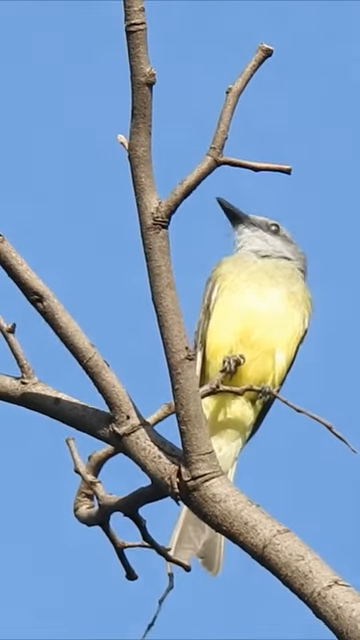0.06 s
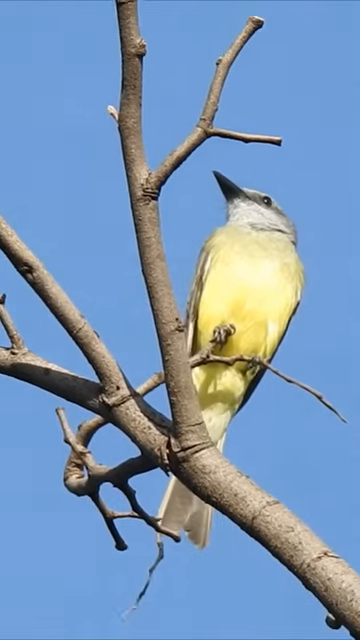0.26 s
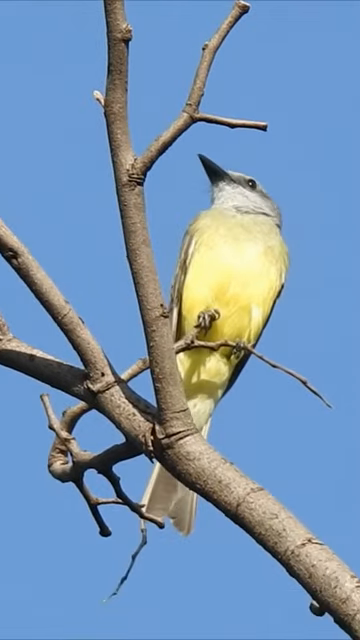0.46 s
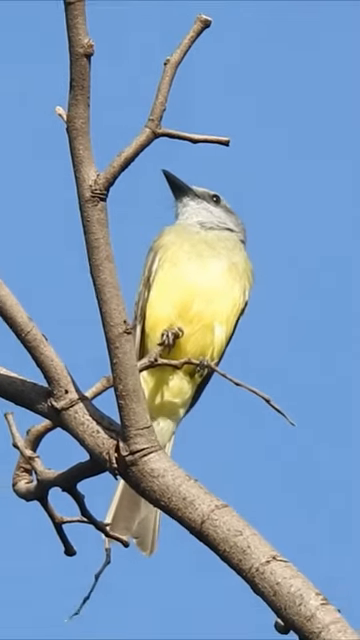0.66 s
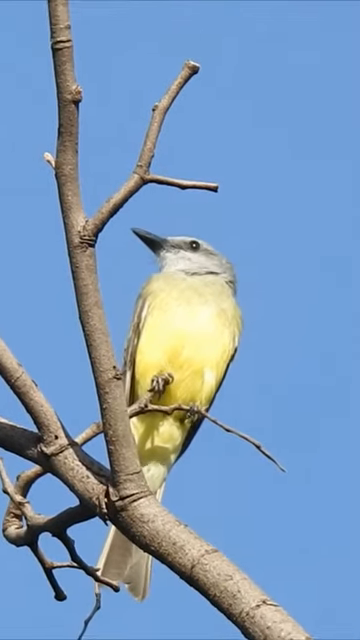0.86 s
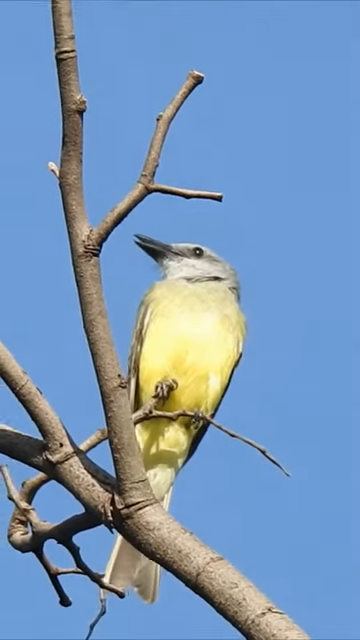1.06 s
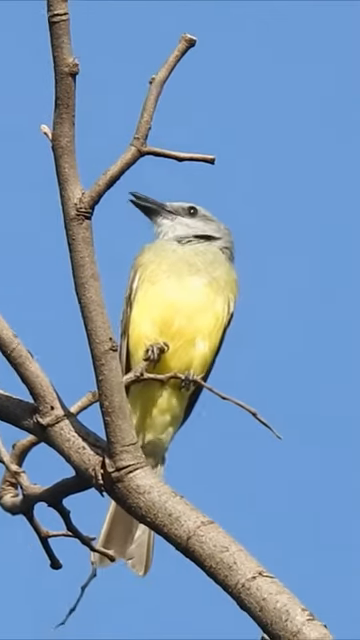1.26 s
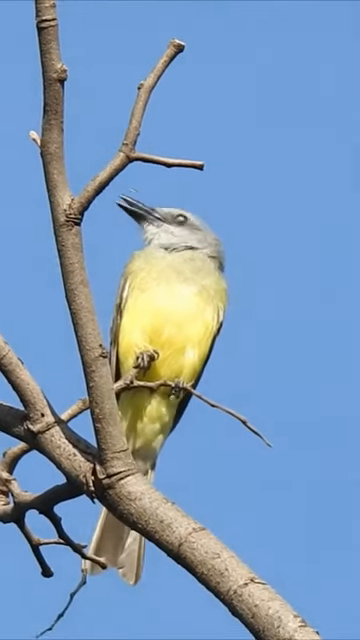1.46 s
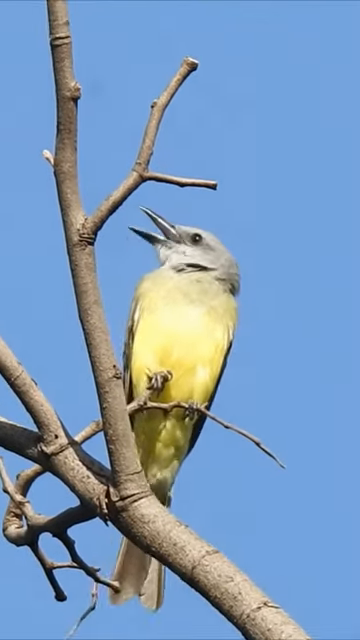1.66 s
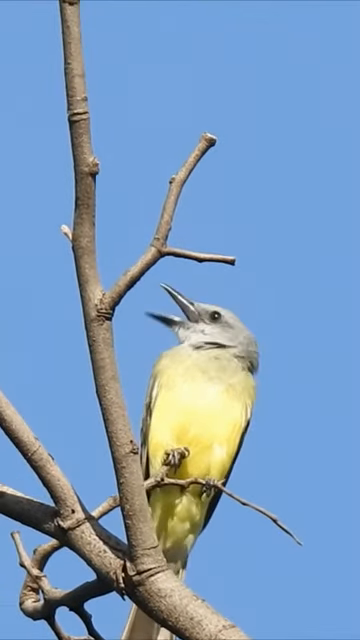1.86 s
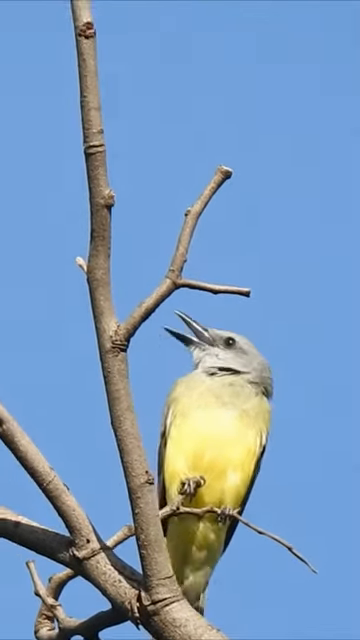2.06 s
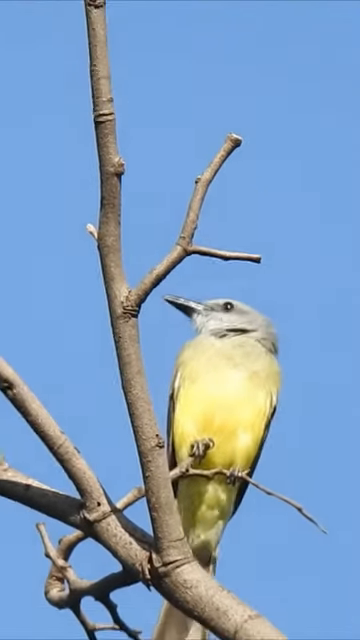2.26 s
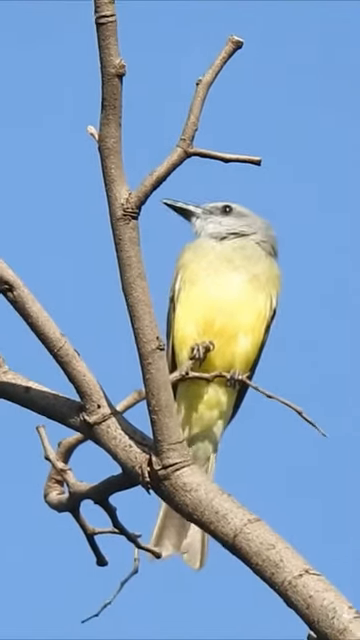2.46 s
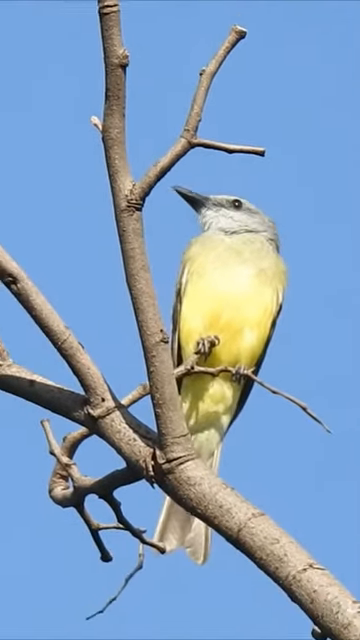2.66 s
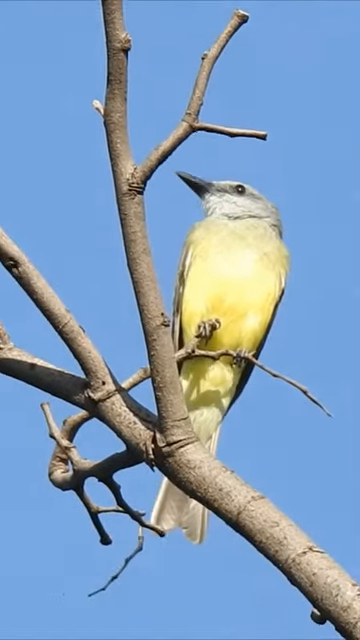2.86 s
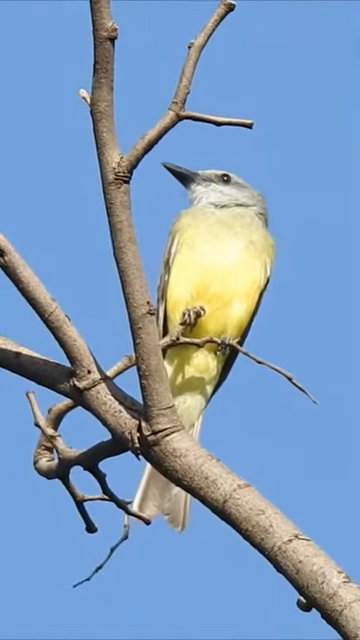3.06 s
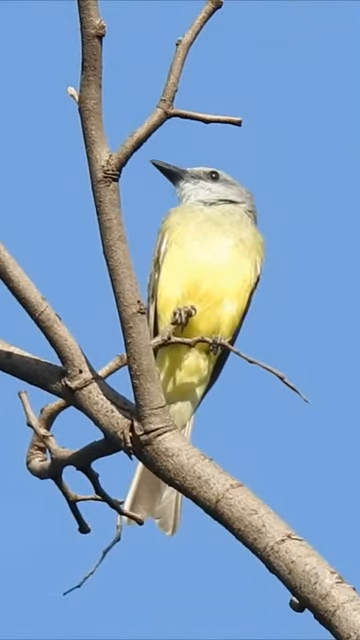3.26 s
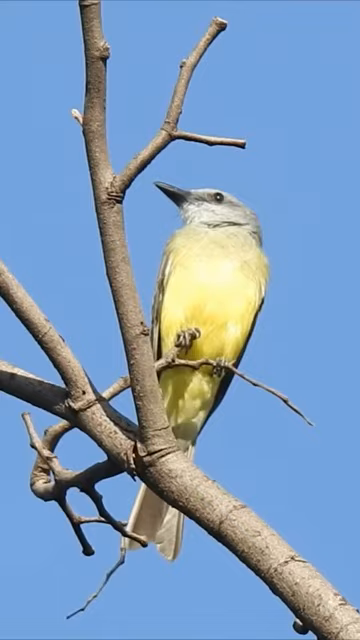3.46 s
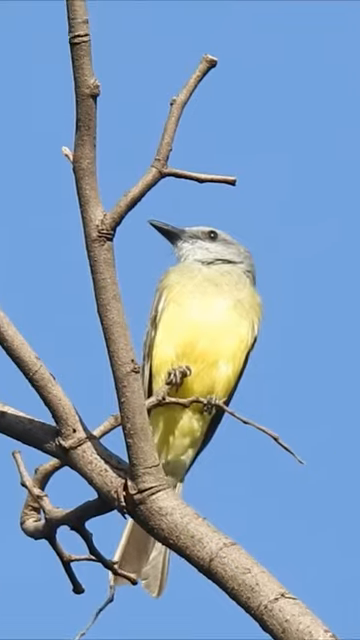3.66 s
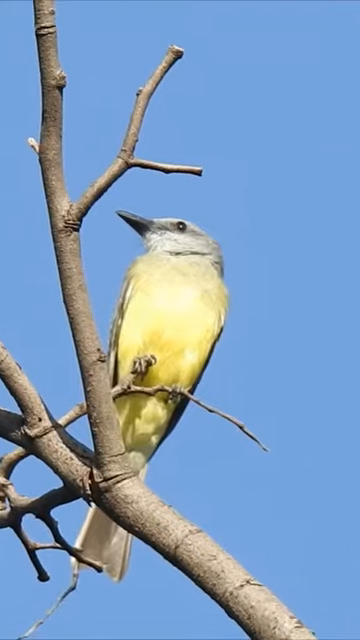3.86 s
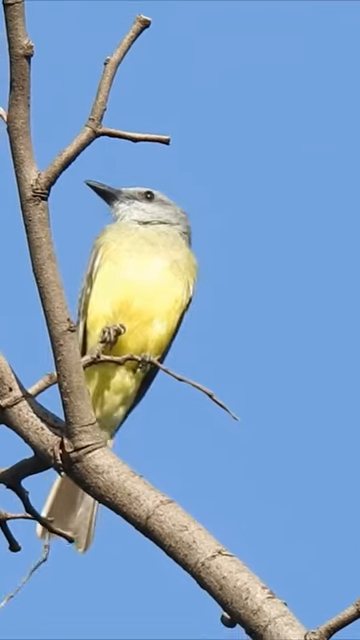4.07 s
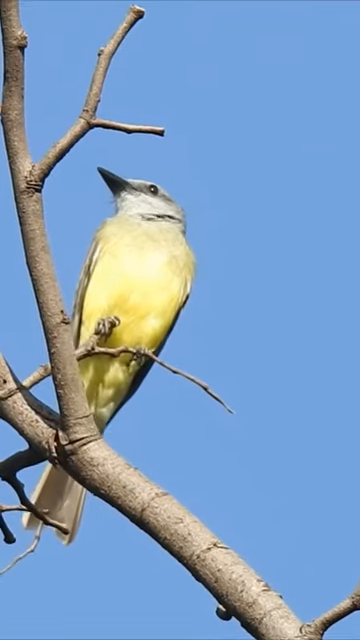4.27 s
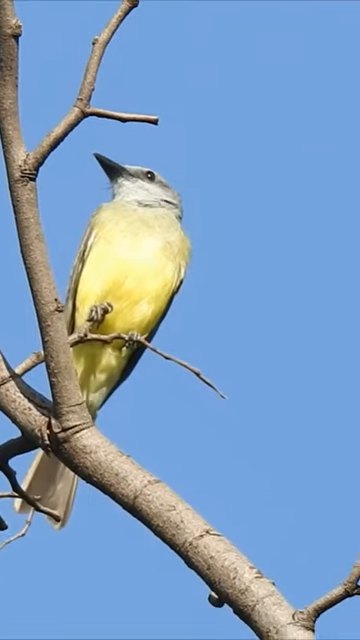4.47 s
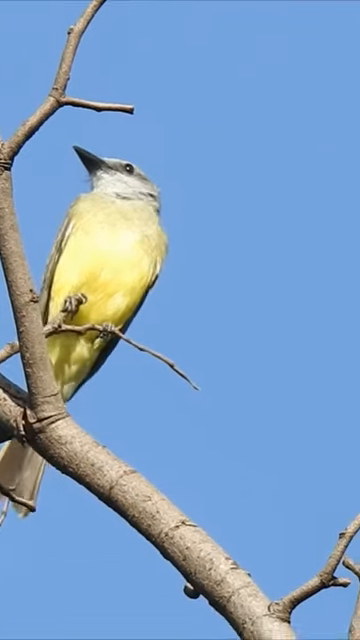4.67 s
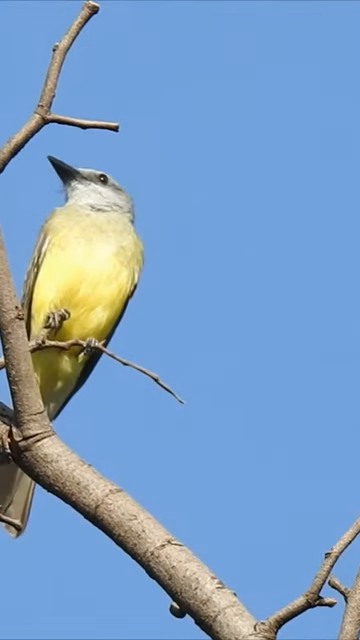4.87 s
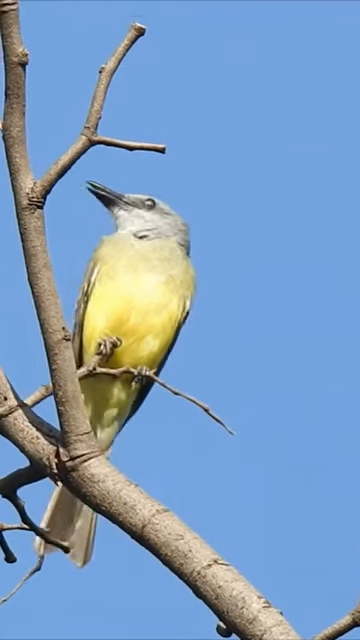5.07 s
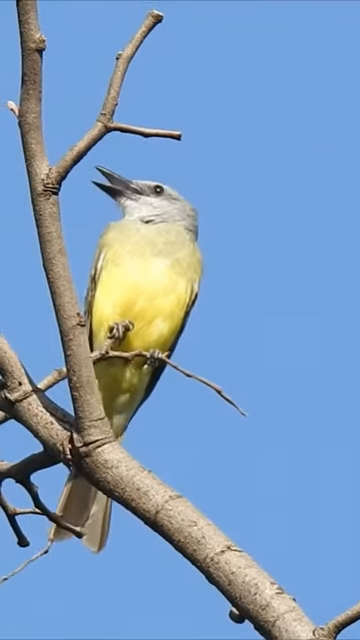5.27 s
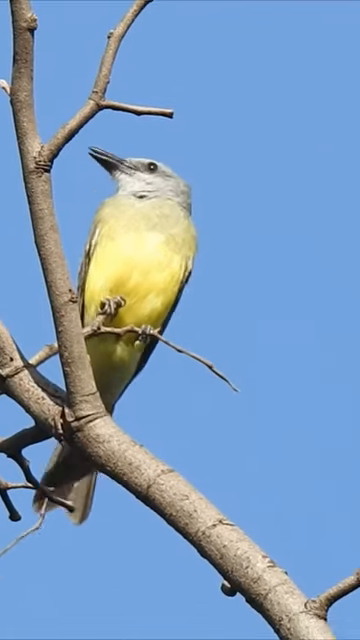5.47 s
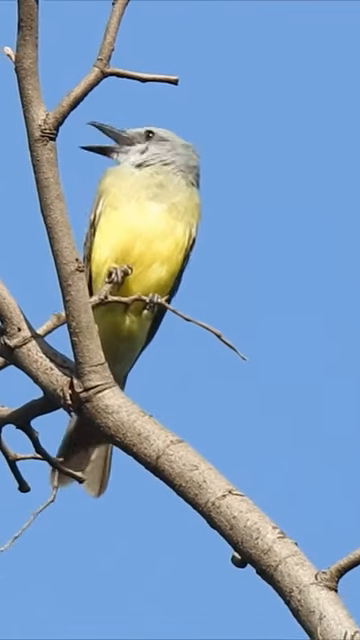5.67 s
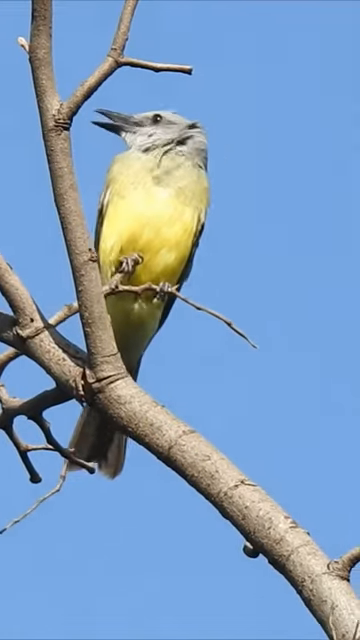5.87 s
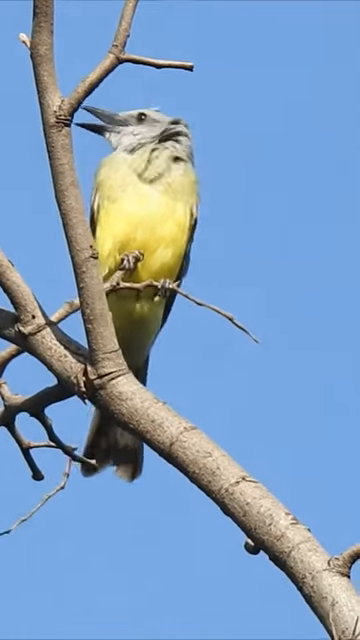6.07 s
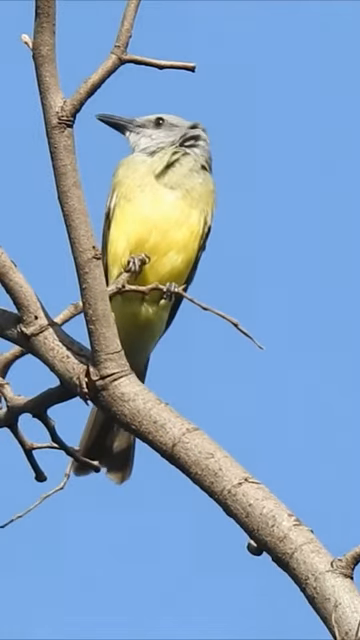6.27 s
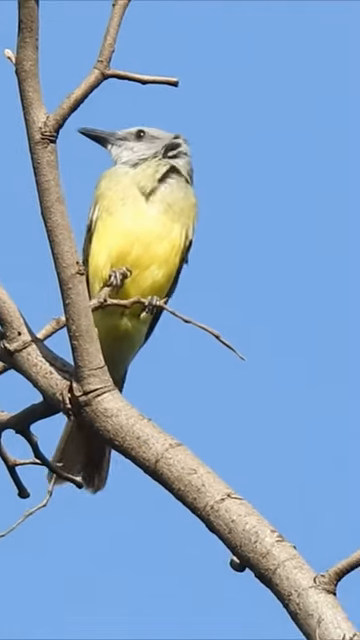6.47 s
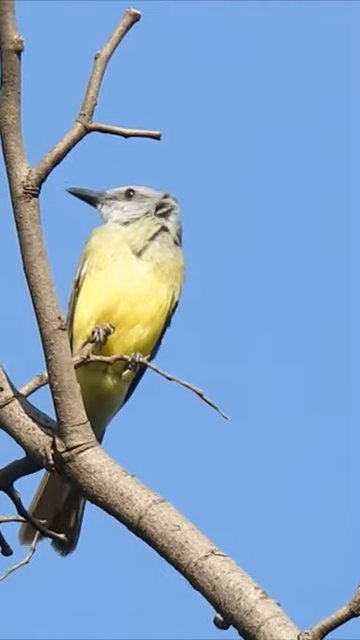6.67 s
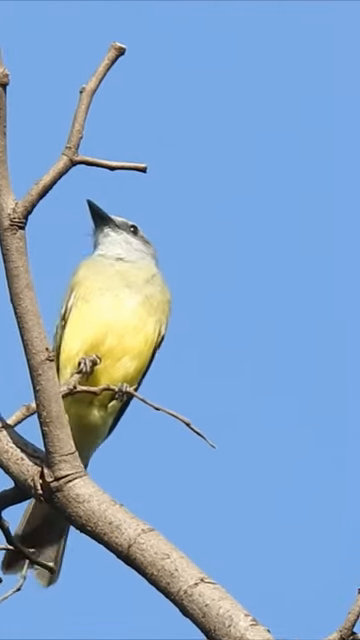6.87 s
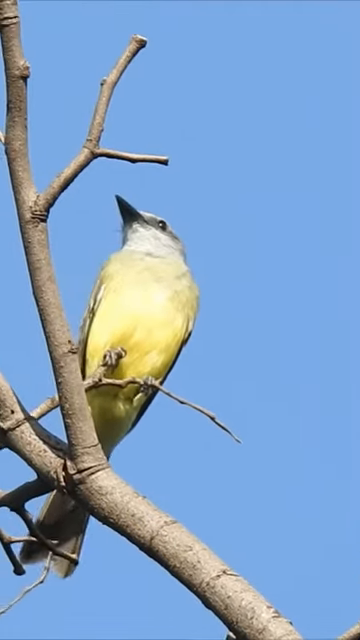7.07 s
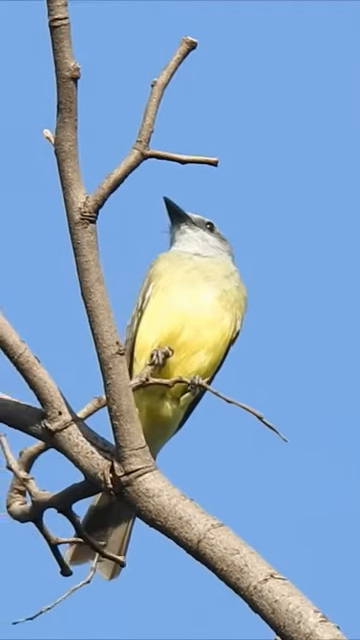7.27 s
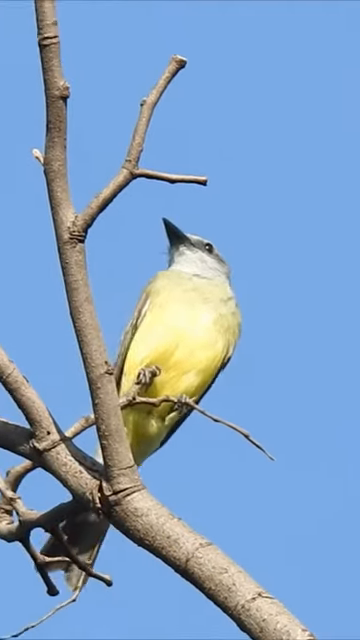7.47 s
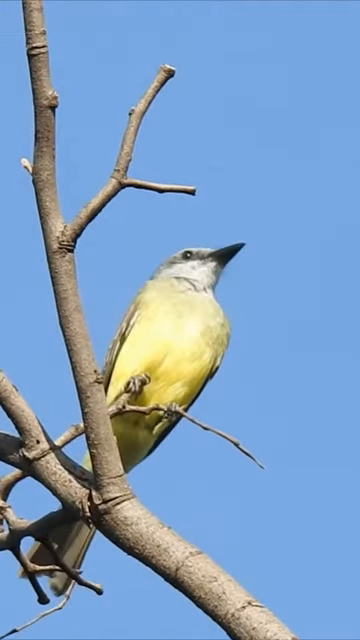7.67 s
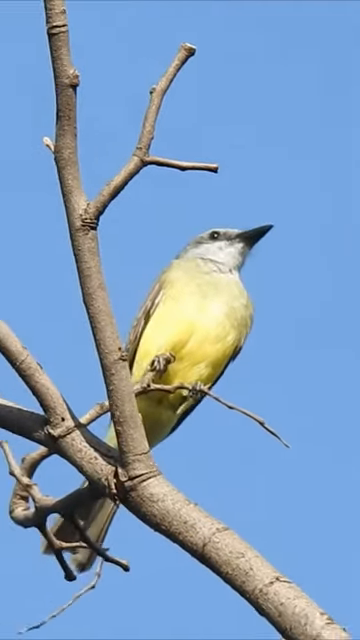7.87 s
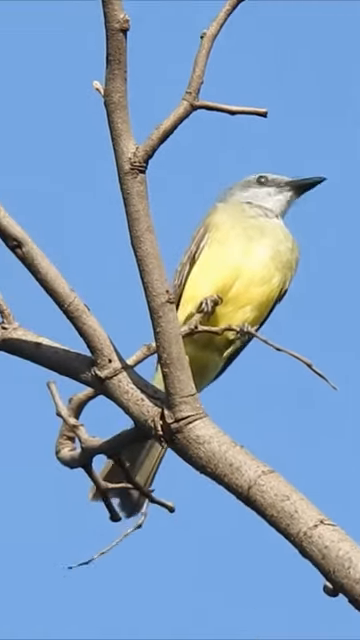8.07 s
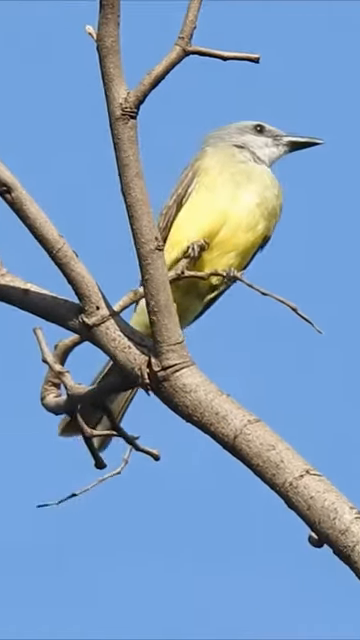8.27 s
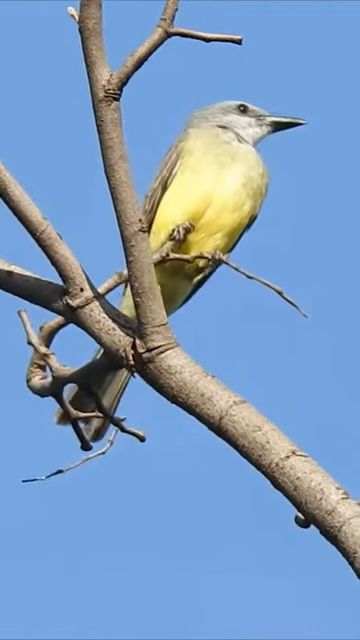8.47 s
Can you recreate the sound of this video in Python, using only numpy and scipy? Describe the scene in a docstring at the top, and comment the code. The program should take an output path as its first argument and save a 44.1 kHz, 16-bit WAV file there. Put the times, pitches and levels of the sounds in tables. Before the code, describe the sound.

A quiet outdoor place among trees: soft low traffic rumble, faint droning and a light rush of air, with a dim insect chorus. A faint distant bird call comes at 0.3 s and a tiny tsip at 0.9. At 1.2 s a bird close to the microphone sings loudly: a quavering high whistle, three round pips, a short buzzy note, an arching whistle, two sharp chips, then a hurried flourish ending at 2.2 s, with brief scattered echoes off the branches. From 3.1 to 3.8 s distant birds give faint buzzy slurs, then a rapid far twitter at 4.2. A thin wavering insect tone near the song's pitch grows from 3.8 to 4.7 s and stays. The close bird repeats its phrase from 5.2 to 6.3 s. Faint tsips follow at 6.8, then weak twitters from 7.4 to 8. The deepest rumble drops near 8 s as a soft, slightly higher roar rises until the end at 8.5.

```python
"""Outdoors among trees: a kingbird sings two twittering phrases, close by, over distant traffic.
Each phrase runs from a quavering lead note through pips, an arch and chips to a rising flourish.
The song is made of bent sine whistles with a faint octave; noise echoes scatter it among the trees.
Far birds are fainter whistles heard mostly by way of the trees; one insect holds a thin wavering tone.
Shaped noise makes the traffic, the rush of air, the insect chorus and a few faint ticks."""
import sys
import numpy as np
from scipy import signal
from scipy.fft import rfft, irfft, next_fast_len
from scipy.io import wavfile
from scipy.ndimage import uniform_filter1d, minimum_filter1d, map_coordinates

SR = 44100
rng = np.random.default_rng(int(sys.argv[2]) if len(sys.argv) > 2 else 0)


def wav_record(signal):
    """Record a signal, one row per channel, as 16-bit PCM in the file named by sys.argv[1]."""
    frames = np.transpose(np.atleast_2d(signal))
    bounded = np.clip(frames, -1, 1)
    # unit amplitude maps onto the largest positive 16-bit level
    quanta = np.round(bounded * 32767).astype(np.int16)
    wavfile.write(sys.argv[1], SR, quanta)


N = 376173

# Traffic rumble spectrum: (frequency [Hz], relative density [dB per Hz])
RUMBLE_SPECTRUM = [(18, -41.5), (30, -22.5), (38, -13), (54, -5.5), (71, 1.5), (90, -4), (120, -9),
                   (150, -11), (195, -10.5), (260, -18.5), (400, -33), (700, -83)]
# Swells of the rumble: (time [s], half length [s], rise [dB])
RUMBLE_SWELLS = [(2.15, .55, 2.5), (6.7, 0.49, 2.5)]
# Droning resonances of the traffic: (centre [Hz], width [Hz], relative level [dB])
DRONE_RESONANCES = [(589.5, 60, -4.5), (850, 45, -6), (1026, 55, -3.5), (1360, 26, -3.5), (1493, 38, -6.5)]
# Rush of air spectrum: (frequency [Hz], relative density [dB per Hz])
AIR_SPECTRUM = [(120, -42.5), (200, -4.5), (370, -5), (500, -7), (700, -8), (1000, -12.5), (1400, -11),
                (2200, -15.5), (3400, -15), (4100, -18.5), (6600, -18), (8500, -23), (11500, -26.5),
                (15700, -33.5)]
# Course that both the air and the drone follow, each at its own offset: (time [s], level [dB])
AIR_LEVEL = [(0, -48.5), (1.1, -48), (1.4, -51), (2.7, -48.5), (4.5, -47.5), (5.6, -51), (6.7, -48),
             (7.6, -50), (8.53, -48.5)]
# Likeness of left and right in the wide noises: (frequency [Hz], correlation [0-1])
STEREO_LIKENESS = [(60, 1), (130, 0.9), (280, 0.75), (610, 0.75), (1310, 0.73), (2840, 0.4),
                   (6140, 0.00075)]
# Band of the insect chorus: (frequency [Hz], relative density [dB per Hz])
CHORUS_SPECTRUM = [(2500, -91), (3700, -31), (4400, -15), (5000, -7), (5600, -9), (6500, -16.5),
                   (8000, -37.5), (10500, -88.5)]
# Decay among the trees: (frequency [Hz], time to fall 60 dB [s])
TREE_DECAY = [(3000, 0.46), (6000, 0.37), (12000, 0.19)]

# Far slurred calls, levels before the distance:
# (time [s], length [s], start pitch [Hz], end pitch [Hz], level [dB], buzz depth [Hz])
FAR_CALLS = [(.33, 0.16, 6030, 5730, -45, 60), (3.077, .13, 6800, 7300, -43.5, 750),
             (3.175, 0.22, 5170, 5620, -45, 60), (3.239, .21, 7730, 6000, -43, 830),
             (3.395, .085, 4760, 3720, -42, 150), (3.671, 0.095, 6000, 5900, -41, 260),
             (7.428, .14, 3500, 2850, -47.5, 500)]
# Far upward tsips, levels before the distance: (time [s], level [dB])
TSIPS = [(.884, -40.5), (3.824, -37.5), (6.79, -38.5), (6.865, -38)]
# Runs of far twitter, levels before the distance:
# (time [s], length [s], first gap [s], first pitch [Hz], crest pitch [Hz], level [dB])
TWITTERS = [(4.203, .36, 0.037, 5360, 6300, -30), (7.389, 0.21, 0.072, 5840, 5850, -43),
            (7.691, 0.312, .051, 6410, 6150, -40)]
# Random straying of each twitter note: (time [s], length [s], pitch [Hz], level [dB])
TWITTER_SCATTER = (.002, .003, 70, 1.8)
# Faint dry ticks, levels before attack and decay: (time [s], level [dB], centre [Hz])
TICKS = [(1.041, -28.5, 3100), (1.523, -33, 7100), (1.943, -25, 7300), (5.667, -24.5, 7820)]

# The close singer's notes, levels before the beak: (time [s], length [s], main pitch [Hz], level [dB])
LEADS = [(1.175, .123, 5232, -3.5), (5.161, .109, 5227, -4)]  # quavering notes that open a phrase
PIPS = [(1.319, .043, 5395, -.5), (1.383, 0.037, 5450, 0), (1.449, .035, 5385, 0), (1.918, .022, 5410, -4),
        (5.298, .045, 5436, -1), (5.363, .039, 5444, -1), (5.428, .034, 5390, -1.5),
        (5.948, .023, 5393, -4.5), (5.986, .022, 5544, -4)]  # short rounded notes
TUTS = [(1.545, 0.0232, 5144, -4.5), (1.955, .019, 5500, -7.5), (5.546, .025, 5026, -8)]  # short buzzy notes that drop away
ARCHES = [(1.64, .11, 6430, -5.5), (5.662, .12, 6320, -5.5)]  # long whistles that rise and fall
CHIPS = [(1.767, .039, 5930, -0.5), (1.821, .038, 5920, 0), (5.799, .037, 5850, -1.5),
         (5.854, 0.037, 5776, -2)]  # pointed notes after the arch
FLICKS = [(1.973, .021, 6800, 1), (6.016, .019, 6984, -4)]  # fast upward sweeps that drop at the end
TWITS = [(2.075, 0.048, 6360, -1.5), (2.133, 0.037, 6460, -1), (6.118, .043, 6330, -4.5),
         (6.178, 0.039, 6404, -1)]  # notes with two crests
RISES = [(2.18, 0.0365, 6540, -4), (6.227, 0.032, 6500, -3.5)]  # notes that close a phrase with a climb and a smaller fall

# Notes with several bends in pitch:
# (share of the length [0-1], pitch [share of the main pitch], level [dB])
LEAD_SHAPE = [(0, 1.08, -18), (.05, 1.01, -10), (.13, .945, -9), (.27, .975, -6), (.76, 1, 0),
              (.89, .985, -1), (.955, .94, -4), (1, .81, -22)]
TWIT_SHAPE = [(0, 0.832, -11.5), (0.15, 0.901, -8.5), (0.36, 0.99, -8.5), (0.52, 0.933, -2.5),
              (0.7, 0.945, 1), (0.85, 0.95, -13.5), (1, 0.817, -17.5)]
# Single arcs: (first pitch [share of the main pitch], crest [share of the length],
# last pitch [share of the main pitch], loudest moment [share of the length],
# first level [dB], last level [dB])
PIP_ARC = (0.92, 0.6, 0.8672, 0.68, -12, -24)
TUT_ARC = (1.07, .45, 0.92, .45, -11, -22)
ARCH_ARC = (0.83, 0.64, 0.63, 0.6, -2, -11.5)
CHIP_ARC = (0.8777, .58, 0.79, .5, -9.5, -23)
FLICK_ARC = (.76, 0.74, 0.78, 0.49, -18.5, -31.5)
RISE_ARC = (0.7642, 0.45, 0.89, 0.3, -14.5, -12)
# What the throat and open beak let through: (frequency [Hz], gain [dB])
BEAK = [(3500, -16.5), (4300, -0.5), (4900, -1.5), (7500, -1), (9400, -7), (10500, 2), (11100, -6),
        (11800, -15.5), (13000, -30.5)]

RUMBLE_DB = -45.5
RUMBLE_DROP_AT_S, RUMBLE_DROP_S, RUMBLE_DROP_DB = 8.0, .2, -8.5
ROAR_AT_S, ROAR_RISE_S, ROAR_DB = 7.92, 0.59, -46.5  # start, rise time, final level
HUM_HZ, HUM_DB, HUM_FADE_DB_PER_S = 397, -47, 40  # pitch, first level, rate of decay
INSECT_FAINT_DB, INSECT_DB, INSECT_AT_S, INSECT_RISE_S = -60.5, -51.5, 3.8, 0.94
TSIP_S, TSIP_START_HZ, TSIP_END_HZ, TSIP_BUZZ_HZ = 0.03, 6450, 7000, 360
TWITTER_SLOWING, TWITTER_DUTY = 1.05, .75  # each gap over the one before; share of a gap a note fills
TWITTER_CREST, TWITTER_SWELL_DB = 0.61, 7  # crest as share of the run; climb in level up to it
TOP_HZ = 15950  # upper band limit of the whole sound


def amp(db):
    """Decibels to gain."""
    return 10 ** (np.asarray(db) / 20)


def unit(x):
    """Scale to rms 1."""
    return x / np.sqrt(np.mean(x ** 2) + 1e-20)


def along(points, hz):
    """Read (frequency, value) points on a log frequency axis."""
    f, v = np.transpose(points)
    return np.interp(np.log(hz + 1), np.log(f + 1), v)


def curves(rows):
    """One value per sample for each column after the time."""
    s, *cols = np.transpose(rows)
    return [np.interp(np.arange(N) / SR, s, c) for c in cols]


def ramp(start, length):
    """Rises evenly from 0 to 1 and stays there."""
    return np.clip((np.arange(N) / SR - start) / length, 0, 1)


def wobble(rate, size=N):
    """A smooth random curve, rate knots a second."""
    knots = rng.standard_normal(int(size * rate / SR) + 4)
    return map_coordinates(knots, [np.arange(size) * rate / SR])


def filtered(x, response):
    """Shape the spectrum of x with a gain that depends on frequency."""
    m = next_fast_len(N + SR // 4)
    spectrum = rfft(x, m) * response(np.fft.rfftfreq(m, 1 / SR))
    return irfft(spectrum, m)[..., :N]


def add(track, s, sound):
    """Mix a sound into a track at time s."""
    part = track[max(round(s * SR), 0):][:len(sound)]
    part += sound[:len(part)]


def cycles(hz):
    """Phase of an oscillator that follows a pitch curve."""
    return 2 * np.pi * np.cumsum(hz) / SR


def resonance(hz, centre, width):
    """A single peak, down to half gain at the edges of its width."""
    return 1 / (1 + (2 * (hz - centre) / width) ** 2)


def rush(colour, patchy_db):
    """Stereo noise of rms 1 with random patches of gain in time and frequency."""
    z = signal.stft(rng.standard_normal((2, N)), nperseg=512)[2]
    field = rng.standard_normal(z.shape[1:])
    field = uniform_filter1d(field, size=6, axis=0)
    field = uniform_filter1d(field, size=16, axis=1)
    pair = signal.istft(z * amp(patchy_db * unit(field)), nperseg=512)[1][:, :N]

    def mid_side_gain(hz):
        # the less alike the channels, the more goes to the side signal
        turn = np.arccos(np.clip(along(STEREO_LIKENESS, hz), -1, 1)) / 2
        return colour(hz) * np.array([np.cos(turn), np.sin(turn)])

    mid, side = filtered(pair, mid_side_gain)
    return unit(np.array([mid + side, mid - side]))


def trees(x, near_db, near_t60, tail_db):
    """Nearby branches scatter a quick echo, different left and right; trees beyond give a longer tail."""
    hz, t, z = signal.stft(rng.standard_normal((2, SR * 2 // 3)), SR, nperseg=256)
    fade = amp(-60 * t / along(TREE_DECAY, hz)[:, None])
    tail = signal.istft(z * fade, SR, nperseg=256)[1]
    t = np.arange(tail.shape[1]) / SR
    near = rng.standard_normal(tail.shape) * amp(-60 * t / near_t60) * (t > .002)
    near_answer = amp(near_db) * near / np.linalg.norm(near[0])
    tail_answer = amp(tail_db) * tail / np.linalg.norm(tail[0])
    return signal.fftconvolve(x[None], near_answer + tail_answer, axes=1)[:, :N]


def arc(form, rise_power=2.1, sag=.4, snap_power=9, fade_power=3):
    """Shape of a note: pitch eases to its crest, sags, then snaps away; level peaks at its loudest moment."""
    first, crest, last, loudest, first_db, last_db = form
    u = np.linspace(0, 1, 100)

    def sides(middle):
        middle = np.clip(middle, .05, .97)
        before = np.maximum(1 - u / middle, 0)
        after = np.maximum(u - middle, 0) / (1 - middle)
        return before, after

    rise, fall = sides(crest)
    attack, release = sides(loudest)
    drop = sag * fall ** 2 + (1 - sag) * fall ** snap_power
    bend = 1 - (1 - first) * rise ** rise_power - (1 - last) * drop
    level_db = first_db * attack ** fade_power + last_db * release ** fade_power
    return np.transpose([u, bend, level_db])


def syllables(notes, shape, quaver_hz, quaver_depth_hz, overtone_db=-35, tremor_db=-0.7):
    """One whistled shape, stretched and pitched for each note; the syrinx quavers as it sings."""
    track = np.zeros(N)
    share, bend, swell_db = np.transpose(shape)
    for s, length, main_hz, db in notes:
        u = np.linspace(0, 1, max(int(length * SR), 200))
        quaver = np.sin(cycles(quaver_hz * (1 + 0.092 * wobble(92, len(u)))))
        glide = uniform_filter1d(np.interp(u, share, bend), size=90, mode="nearest")
        roughness_hz = 18 * wobble(500, len(u))
        phase = cycles(main_hz * glide + quaver_depth_hz * quaver + roughness_hz)
        level_db = db + np.interp(u, share, swell_db) + tremor_db * quaver
        effort = amp(level_db) * signal.windows.tukey(len(u), .06)
        add(track, s, effort * (np.sin(phase) + amp(overtone_db) * np.sin(2 * phase)))
    return track


def background():
    """Far traffic rumbles, drones, hums and roars as shaped noise and a sine, under a soft rush of air."""
    t = np.arange(N) / SR
    air_db, = curves(AIR_LEVEL)

    swell_db = sum(db * np.exp(-((t - s) / half) ** 2) for s, half, db in RUMBLE_SWELLS)
    rumble_db = RUMBLE_DB + swell_db + RUMBLE_DROP_DB * ramp(RUMBLE_DROP_AT_S, RUMBLE_DROP_S)
    rumble_noise = rush(lambda hz: amp(along(RUMBLE_SPECTRUM, hz)), patchy_db=1.5)
    rumble = amp(rumble_db + wobble(6.3)) * rumble_noise

    breeze = rush(lambda hz: amp(along(AIR_SPECTRUM, hz)), patchy_db=1.8)
    air = amp(air_db + 2.0 + 1.3 * wobble(17)) * breeze

    def drone_colour(hz):
        return sum(amp(db) * resonance(hz, centre, width) for centre, width, db in DRONE_RESONANCES)

    drone = amp(air_db - 6 + 1.5 * wobble(12)) * rush(drone_colour, patchy_db=3)

    roar_noise = rush(lambda hz: resonance(hz, 210, 140), patchy_db=2)
    roar = amp(ROAR_DB) * ramp(ROAR_AT_S, ROAR_RISE_S) * roar_noise

    hum_tone = unit(np.sin(cycles(HUM_HZ + 8 * wobble(40))))
    hum = amp(HUM_DB - HUM_FADE_DB_PER_S * t) * hum_tone
    return rumble + air + drone + roar + hum


def insects():
    """One thin tone, wavering separately left and right, grows over the hiss of a far chorus."""
    tone = np.array([np.sin(cycles(5010 + 65 * wobble(400))) for _ in range(2)])
    chorus = rush(lambda hz: amp(along(CHORUS_SPECTRUM, hz)), patchy_db=1)
    growth = ramp(INSECT_AT_S, INSECT_RISE_S)
    tone_db = INSECT_FAINT_DB + (INSECT_DB - INSECT_FAINT_DB) * growth
    return amp(tone_db) * unit(tone) + amp(-50) * chorus


def twitter(start, length, gap, first_hz, crest_hz, db):
    """Notes of one run: ever slower, pitch bending and level swelling to a crest, each straying at random."""
    gaps = gap * TWITTER_SLOWING ** np.arange(np.ceil(length / gap))
    times = np.cumsum(gaps) - gaps
    slack = (times / (TWITTER_CREST * length) - 1) ** 2  # 1 at the start, 0 at the crest
    pitches = crest_hz + (first_hz - crest_hz) * slack
    levels = db - TWITTER_SWELL_DB * slack
    notes = np.transpose([start + times, TWITTER_DUTY * gaps, pitches, levels])
    notes = notes[times < length]
    return notes + rng.standard_normal(notes.shape) * TWITTER_SCATTER


def far_birds():
    """Distant twitters, tsips and buzzy slurs: gliding whistles heard mostly by way of the trees."""
    notes = [note for run in TWITTERS for note in twitter(*run)]
    calls = syllables(notes, arc(CHIP_ARC), quaver_hz=152, quaver_depth_hz=45)
    tsips = [(s, TSIP_S, TSIP_START_HZ, TSIP_END_HZ, db, TSIP_BUZZ_HZ) for s, db in TSIPS]
    for s, length, start_hz, end_hz, db, buzz_hz in FAR_CALLS + tsips:
        n = int(length * SR)
        # half a regular flutter, half random roughness
        buzz = .5 * np.sin(cycles(130 * (1 + 0.25 * wobble(90, n)))) + .5 * wobble(900, n)
        pitch = np.linspace(start_hz, end_hz, n) + buzz_hz * buzz
        add(calls, s, amp(db) * signal.windows.cosine(n) * np.sin(cycles(pitch)))
    return amp(-4.0) * calls + trees(calls, near_db=-6.5, near_t60=.2, tail_db=-4.5)


def ticks(t60=0.0099):
    """Each tick is a brief burst of noise in one broad band, dying away by 60 dB in t60 seconds."""
    track = np.zeros(N)
    t = np.arange(SR // 40) / SR
    hz = np.fft.rfftfreq(len(t), 1 / SR)
    for s, db, centre_hz in TICKS:
        band = 1 / (1 + ((hz / centre_hz - 1) / .35) ** 4)
        noise = irfft(rfft(rng.standard_normal(len(t))) * band, len(t))
        attack = 1 - np.exp(-t / .0003)
        add(track, s, amp(db - 60 * t / t60) * attack * unit(noise))
    return track


def kingbird():
    """The close singer: nearly pure whistles with a faint octave, coloured by throat and beak."""
    pip_shape = arc(PIP_ARC, sag=.6, snap_power=5, fade_power=4.1)
    tut_shape = arc(TUT_ARC, sag=.55, snap_power=5)
    song = syllables(LEADS, LEAD_SHAPE, quaver_hz=198, quaver_depth_hz=85,
                     overtone_db=-34, tremor_db=.8)
    song += syllables(PIPS, pip_shape, quaver_hz=214, quaver_depth_hz=17,
                      overtone_db=-35, tremor_db=0.0)
    song += syllables(TUTS, tut_shape, quaver_hz=193.3, quaver_depth_hz=131,
                      overtone_db=-32.5, tremor_db=-1.0)
    high_notes = [
        (ARCHES, arc(ARCH_ARC, sag=.35, snap_power=14, fade_power=7)),
        (CHIPS, arc(CHIP_ARC, rise_power=1.4, sag=.6)),
        (FLICKS, arc(FLICK_ARC, rise_power=1.1, fade_power=2.2)),
        (TWITS, TWIT_SHAPE),
        (RISES, arc(RISE_ARC, rise_power=1.7, fade_power=2.4)),
    ]
    for notes, shape in high_notes:
        song += syllables(notes, shape, quaver_hz=193.6, quaver_depth_hz=25,
                          overtone_db=-36.0, tremor_db=0.0)
    song = filtered(song, lambda hz: amp(along(BEAK, hz)))
    return song + trees(song, near_db=-6.5, near_t60=0.18, tail_db=-10)


def scene():
    """The singer in front of everything far away."""
    return background() + insects() + far_birds() + ticks() + kingbird()


def record(dry, ceiling=.99, top=1.06, hardness=11):
    """A fast limiter holds the loudest notes, crests round off slightly, and a band limit trims the top."""
    needed = np.minimum(1, ceiling / (np.abs(dry).max(axis=0) + 1e-9))
    gain = uniform_filter1d(minimum_filter1d(needed, size=180), size=130)
    fine = signal.resample_poly(dry * gain, 2, 1, axis=1)  # rounded at twice the sample rate
    rounded = fine / (1 + np.abs(fine / top) ** hardness) ** (1 / hardness)
    return filtered(signal.resample_poly(rounded, 1, 2, axis=1), lambda hz: hz < TOP_HZ)


dry = scene()
out = record(dry)
wav_record(out)
```